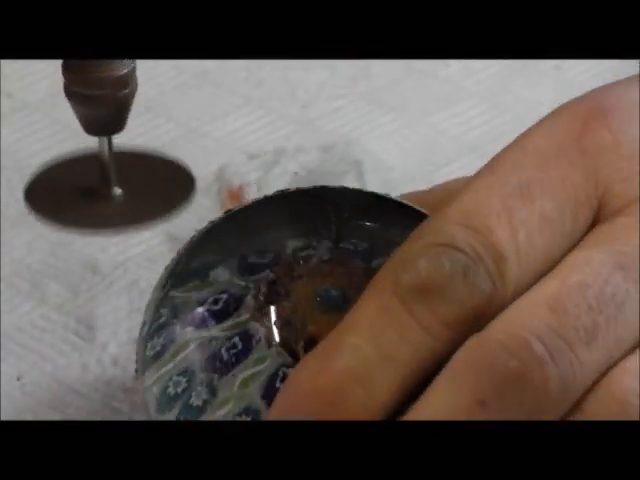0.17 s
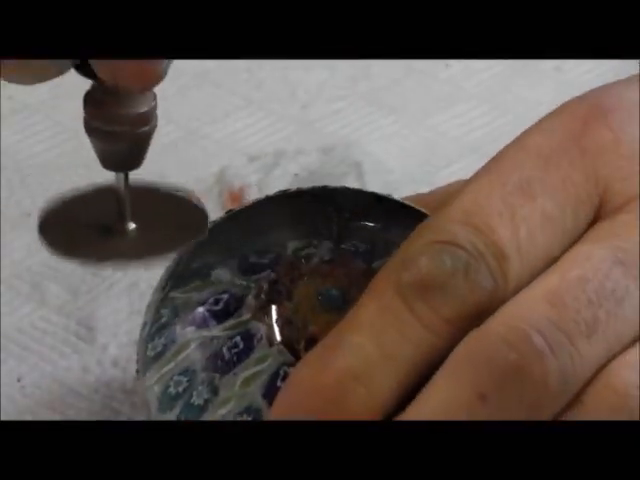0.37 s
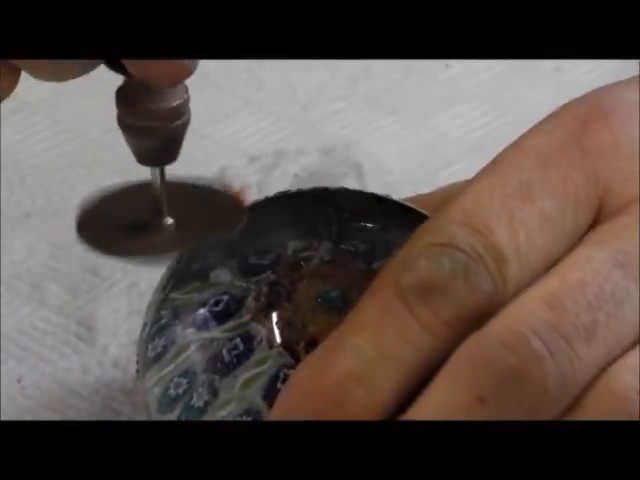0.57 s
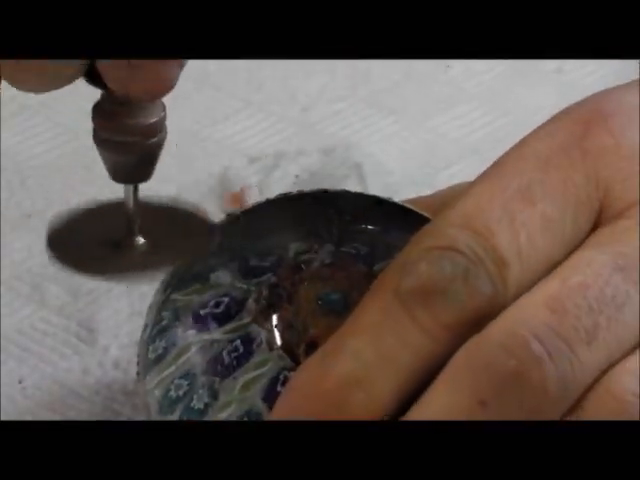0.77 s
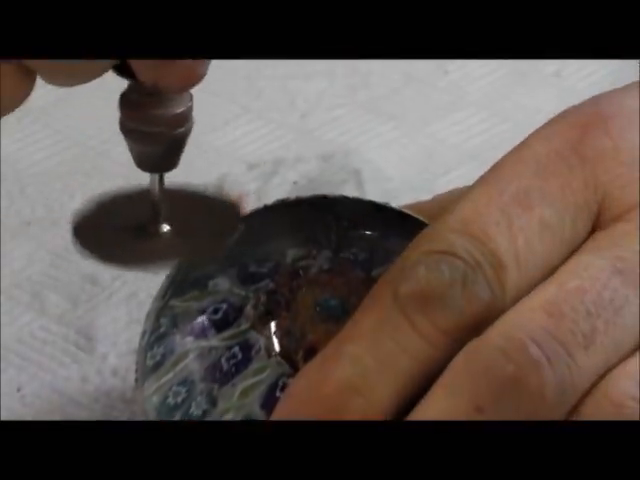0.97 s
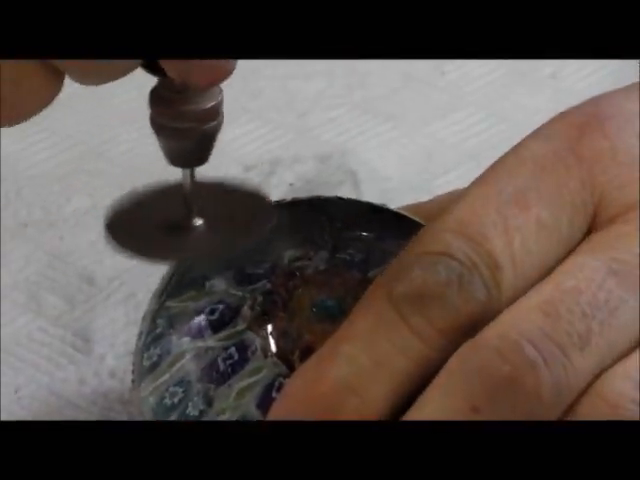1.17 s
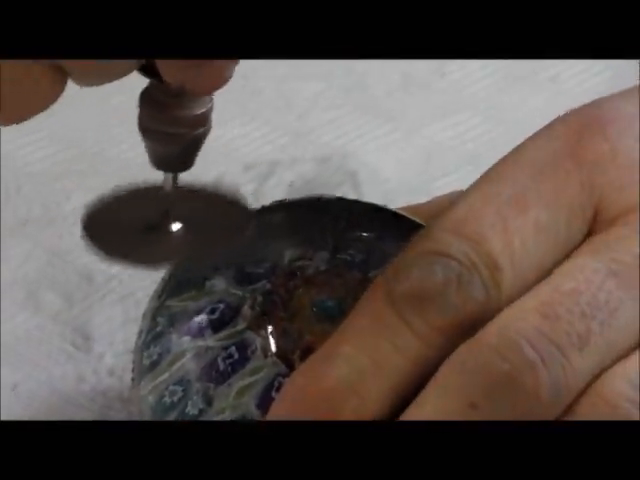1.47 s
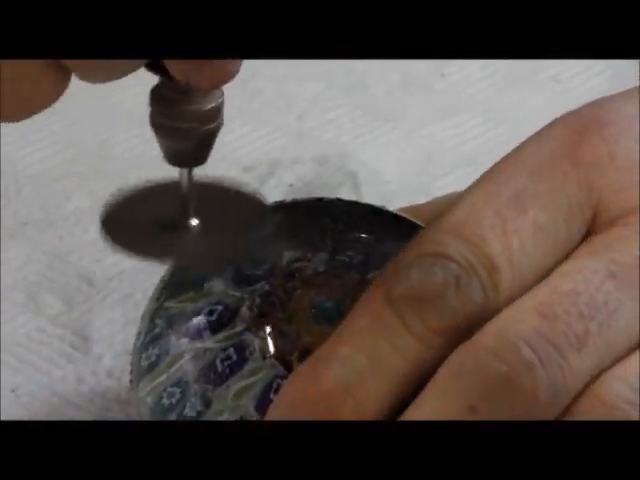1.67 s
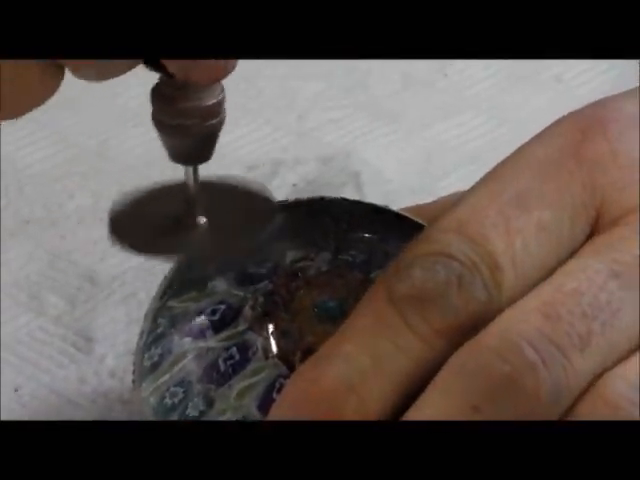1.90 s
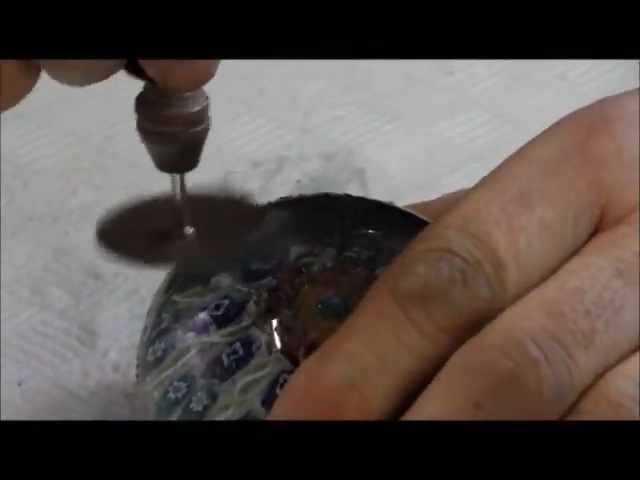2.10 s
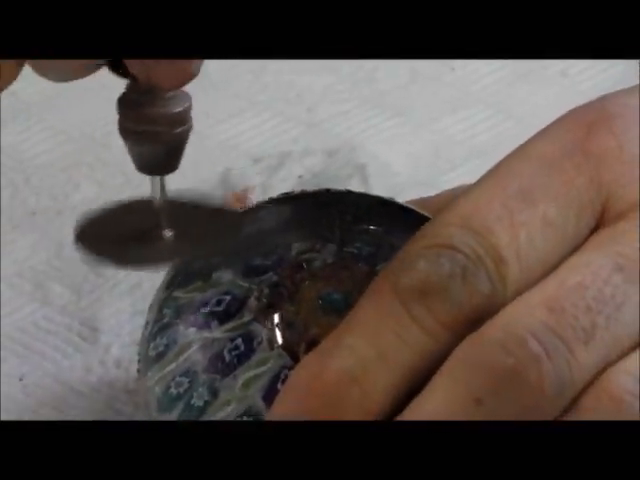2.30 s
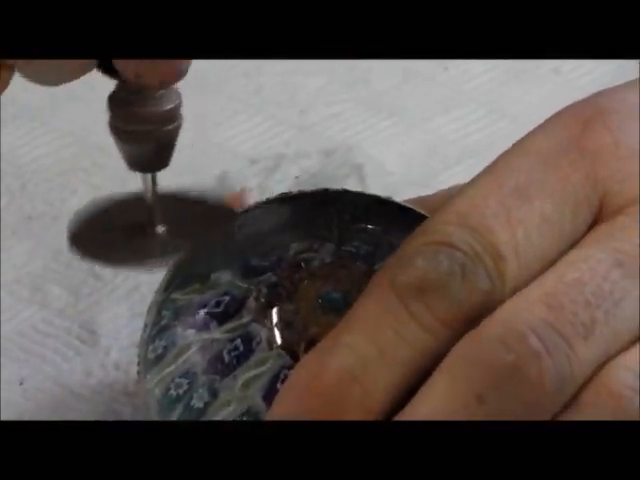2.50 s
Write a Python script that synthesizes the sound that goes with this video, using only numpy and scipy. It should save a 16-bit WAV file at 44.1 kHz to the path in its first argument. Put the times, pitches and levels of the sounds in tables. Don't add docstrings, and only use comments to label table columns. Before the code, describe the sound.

Gritty buzzing of a small spinning abrasive disc against glass, nine strokes, pitch sagging under load

```python
import sys
import numpy as np
from scipy import signal
from scipy.fft import rfft, irfft, next_fast_len
from scipy.io import wavfile
from scipy.ndimage import uniform_filter1d, map_coordinates

SR = 44100
rng = np.random.default_rng(int(sys.argv[2]) if len(sys.argv) > 2 else 0)


def gain_from_db(level_db):
    decades = np.asarray(level_db, float) / 20
    return 10 ** decades


def wav_record(signal):
    frames = np.transpose(np.atleast_2d(signal))
    bounded = np.clip(frames, -1, 1)
    quanta = np.round(bounded * 32767).astype(np.int16)
    wavfile.write(sys.argv[1], SR, quanta)


N = 116865
TIME_S = np.arange(N) / SR
FIRST_TOUCH_S = 0.432


def rms_one(x):
    return x / np.sqrt(np.mean(x ** 2) + 1e-20)


def in_time(rows):
    return np.interp(TIME_S, *np.transpose(rows))


def at_hz(points, hz):
    f, v = np.transpose(points)
    return np.interp(np.log(hz + 1), np.log(f + 1), v)


def drift(rate_hz):
    pole = np.exp(-80 * np.pi * rate_hz / SR)
    slow = rng.standard_normal(N // 40 + 2002)
    slow = signal.lfilter([1], [1, -2 * pole, pole * pole], slow)[2000:]
    return np.interp(np.arange(N) / 40, np.arange(len(slow)), rms_one(slow - slow.mean()))


def colour(x, spectrum, peaks=()):
    size = next_fast_len(N + 4096)
    hz = np.fft.rfftfreq(size, 1 / SR)
    power = gain_from_db(at_hz(spectrum, hz)) ** 2
    for centre_hz, width_hz, db in peaks:
        detuning = 2 * (hz - centre_hz) / (width_hz * 1.3)
        power += gain_from_db(db + 4) ** 2 / (1 + detuning ** 2) ** 2
    cepstrum = irfft(0.5 * np.log(power / power.mean()), size)
    cepstrum[1:size // 2] *= 2
    cepstrum[size // 2 + 1:] = 0
    return irfft(rfft(x, size) * np.exp(rfft(cepstrum)), size)[..., :N]


def above_8khz(x):
    return signal.sosfilt(signal.butter(8, 8000, "high", fs=SR, output="sos"), x)


# time_s, shaft_hz [turns per s]
SHAFT_SPEED = [(0, 125.6), (.44, 125.6), (.53, 120), (.63, 116.5), (.8, 115), (1.0, 114.5), (1.1, 112),
               (1.5, 112), (1.9, 112.5), (2.3, 108.8), (2.45, 112), (2.65, 110)]


def shaft_hz():
    return in_time(SHAFT_SPEED)


# order [multiple of shaft speed], level_db [dB rms]
WHINE_ORDERS = [(18, -36.5), (17.6, -52), (18.38, -50), (72.1, -46), (22.3, -53), (33, -55), (30.4, -55),
                (8.0, -53), (24.0, -55), (32.0, -55), (40.0, -50), (48.0, -58), (56.0, -62)]


def whine(turns):
    loaded = np.clip((TIME_S - FIRST_TOUCH_S) / 0.12, 0, 1)
    wander = np.cumsum(0.0006 * drift(30) * shaft_hz()) / SR
    tones = np.zeros(N)
    for order, level_db in WHINE_ORDERS:
        level = np.sqrt(2) * gain_from_db(level_db + 0.8 * drift(4))
        tones += level * np.sin(2 * np.pi * (order * (turns + wander) + rng.random()))
    return gain_from_db(-24 * loaded) * tones


# pitch_hz [Hz], level_db [dB rms]
FAN_TONES = [(100, -68.5), (200, -61), (300, -64), (400, -53), (500.3, -50)]


def hum():
    tones = np.zeros(N)
    for pitch_hz, level_db in FAN_TONES:
        level = np.sqrt(2) * gain_from_db(level_db + 1.5 * drift(5))
        tones += level * np.sin(2 * np.pi * pitch_hz * TIME_S + 0.4 * drift(6))
    return tones


# frequency_hz [Hz], level_db [dB]
AIR_SPECTRUM = [(25, -3.5), (330, -3.5), (480, 1), (1200, -0.5), (1500, 4.5), (2400, 7), (4200, 5.7),
                (7600, 2), (9000, -79)]
# frequency_hz [Hz], level_db [dB]
AIR_TOP_SPECTRUM = [(8050, -18.5), (9000, -16.5), (13000, -25.5), (15100, -23), (15900, -30.5)]


def air():
    low = gain_from_db(-30 + 0.32 * drift(6.7)) * colour(rng.standard_normal((2, N)), AIR_SPECTRUM)
    top = colour(above_8khz(rng.standard_normal((2, N))), AIR_TOP_SPECTRUM)
    return low + gain_from_db(-34) * rms_one(top)


# time_s [s], level_db [dB]
BACKGROUND_LEVEL = [(0, 0), (1.2, -2), (2.65, -4)]


def background_gain(push_db):
    excess_db = np.maximum(push_db + 26, 0)
    return gain_from_db(in_time(BACKGROUND_LEVEL) - 0.2 * uniform_filter1d(excess_db, 900))


# time_s [s], level_db [dB]
LIGHT_TOUCH = [(.45, -28), (1.2, -28.5), (2.6, -31.5)]
# start_s [s], length_s [s], first_push_db [dB], second_push_db [dB]
GLASS_STROKES = [
    (.432, 0.2, -21, -22),
    (0.694, 0.34, -22.5, -25),
    (1.054, 0.12, -16, -19.5),
    (1.285, .145, -17.5, -19),
    (1.526, 0.14, -18.5, -16.5),
    (1.81, 0.1, -19.5, -15.5),
    (2.059, 0.054, -21.5, -13),
    (2.238, 0.095, -24, -16),
    (2.482, 0.08, -22.5, -16),
]


def pressure_db():
    attack_s, bite_share, release_db_per_s = 0.025, 0.3, 203
    power = gain_from_db(in_time(LIGHT_TOUCH)) ** 2 * (TIME_S > FIRST_TOUCH_S + attack_s)
    for start_s, length_s, first_db, second_db in GLASS_STROKES:
        since_s = TIME_S - start_s
        progress = since_s / length_s
        db = first_db + (second_db - first_db) * np.clip(progress, 0, 1)
        db += 1.0 * np.exp(-((progress - 0.6) / 0.36) ** 2)
        db -= release_db_per_s * np.maximum(since_s - length_s, 0)
        swell = np.clip(since_s / attack_s + 0.5, 0, 1)
        onset = bite_share * (since_s > 0) + (1 - bite_share) * swell
        power = power + (gain_from_db(db) * onset) ** 2
    return 10 * np.log10(power + 1e-12) + 0.4 * drift(16.7)


# place [share of a turn, 0-1], level_db [dB]
RIM_HIGH_SPOTS = [
    (0.01, 0.1),
    (.1, -8),
    (.52, -7),
]


def knocks(turns, loose):
    scatter_db, swell_db, jitter_turns, wander_turns = 1.5, 3.5, 0.004, 0.03
    hits, turn = np.zeros(N), np.arange(int(turns[-1]) - 1)
    now = np.searchsorted(turns, turn)
    for place, spot_db in RIM_HIGH_SPOTS:
        luck = rng.standard_normal((len(turn), 2))
        shift = loose[now] * (jitter_turns * luck[:, 0] + wander_turns * drift(11)[now])
        at = np.interp(turn + place + shift, turns, np.arange(N)).astype(int)
        hits[at] += gain_from_db(spot_db + loose[now] * (scatter_db * luck[:, 1] + swell_db * drift(5.2)[now]))
    skid_s = 0.003
    age_s = np.arange(int(3 * skid_s * SR) + 2) / SR
    skid = np.convolve(hits, np.exp(-age_s / skid_s))[:N] * rng.standard_normal(N)
    return rms_one(hits + 0.4 * loose * skid)


def grit(throb):
    grains_per_s, spread_db = 4400, 1.24
    struck = rng.random(N) < grains_per_s / SR
    strength = gain_from_db(spread_db * np.minimum(rng.exponential(1, N), 5))
    return rms_one(struck * strength * rng.choice([-1, 1], N) * throb)


def rim_grain(turns):
    memory = 0.92
    rows = rng.standard_normal((int(turns[-1]) + 30, 130)) ** 3
    rows = signal.lfilter([1], [1, -memory], rows, axis=0)[28:]
    return rms_one(map_coordinates(rows, [np.floor(turns), turns % 1 * 129], order=0))


# frequency_hz [Hz], level_db [dB]
SCRAPE_SPECTRUM = [(300, -34), (700, -18.5), (1150, -16), (1400, -8.5), (2300, -2.5), (3500, -4.5),
                   (4400, 0.5), (5000, -5.5), (7600, -14), (9000, -23)]
# pitch_hz [Hz], width_hz [Hz], level_db [dB]
EARLY_MODES = [(915, 90, -17), (1630, 50, -9), (1930, 140, -1), (2280, 70, -4), (2510, 90, -3),
               (2780, 80, -2.5), (3110, 100, -7), (4170, 100, -5), (4390, 90, 1.5), (4630, 90, -6)]
# pitch_hz [Hz], width_hz [Hz], level_db [dB]
LATE_MODES = [(1370, 40, -4), (1560, 100, -2), (1920, 110, -3), (2200, 120, 1.5), (2480, 60, -3),
              (2750, 90, -6), (3320, 140, -6), (4060, 110, .1), (4260, 90, -3), (4380, 60, 1.5),
              (4565, 60, -5)]


def ringing(push, late):
    early_body = colour(np.sqrt(1 - late) * push, SCRAPE_SPECTRUM, EARLY_MODES)
    return early_body + colour(np.sqrt(late) * push, SCRAPE_SPECTRUM, LATE_MODES)


# order [multiple of shaft speed], level_db [dB]
LOAD_ORDERS = [(6.0, -42), (7.0, -53), (8.0, -45), (10.0, -51), (12.0, -50)]
# time_s [s], level_db [dB]
LOAD_ORDER_LEVEL = [(.45, -30), (.55, 0), (.9, -1), (1.2, -7), (2.65, -10)]


def loaded_orders(turns):
    tones = np.zeros(N)
    for order, level_db in LOAD_ORDERS:
        level = gain_from_db(level_db + 2 * drift(6))
        tones += level * np.sin(2 * np.pi * (order * turns + rng.random()))
    return tones * gain_from_db(in_time(LOAD_ORDER_LEVEL))


# frequency_hz [Hz], level_db [dB]
SPRAY_SPECTRUM = [(8050, -7), (10300, 3), (12200, 1.5), (14500, -4.5), (15900, -9.5)]


def spray(drive, throb, late, push_db):
    hiss = above_8khz(1.9 * drive + throb * rng.standard_normal(N))
    wet_db, follow_db = 6 * (1.5 - late), 0.6 * (push_db + 14.5)
    return rms_one(colour(hiss, SPRAY_SPECTRUM)) * gain_from_db(-35.5 + wet_db + follow_db)


def grinding(turns, push_db):
    loose = np.clip((TIME_S - 0.64) / 0.08, 0.1, 1)
    late = np.clip((TIME_S - 0.86) / 0.24 + 0.5, 0, 1)
    throb = 1 + 0.42 * np.cos(2 * np.pi * (turns - 0.1))
    knock_db = -1.5 + 3 * (1 - loose) + 0.8 * (np.clip(push_db, -32, 0) + 23)
    drive = gain_from_db(knock_db) * knocks(turns, loose)
    drive += gain_from_db(-8.5) * grit(throb)
    drive += gain_from_db(0.5 - 6 * late) * rim_grain(turns) * throb
    even = int(0.02 * SR)
    drive = drive / np.sqrt(uniform_filter1d(uniform_filter1d(drive ** 2, even), even))
    body = ringing(gain_from_db(push_db) * drive, late)
    return body + loaded_orders(turns) + spray(drive, throb, late, push_db)


def reflections(x, t60_s):
    t = np.arange(int(t60_s * SR)) / SR
    tail = rng.standard_normal((2, len(t))) * gain_from_db(-60 * t / t60_s)
    tail = tail / np.sqrt(np.sum(tail ** 2, 1, keepdims=True))
    return signal.fftconvolve(x[None], tail)[:2, :N]


# frequency_hz [Hz], likeness [0-1]
PORT_LIKENESS = [(60, 0.036), (180, 0.082), (550, .85), (1650, 0.9), (4970, 0.67), (15000, 0.1)]
# frequency_hz [Hz], level_db [dB]
PORT_BALANCE = [(60, -1), (125, 1.5), (250, 4.5), (1000, 5), (4000, 3), (8000, .3), (13000, -2)]
# frequency_hz [Hz], lag_s [s]
PORT_LAG = [(1000, 2.0e-5), (4400, 2.0e-5), (7000, 4.0e-5), (16000, 5.2e-5)]


def ports(shared, opposed):
    hz = np.fft.rfftfreq(N, 1 / SR)
    alike = np.clip(at_hz(PORT_LIKENESS, hz), 0, 1)
    side = np.array([[0.5], [-0.5]])
    both = np.sqrt(0.5 + alike / 2) * rfft(shared)
    both = both + 2 * side * np.sqrt(0.5 - alike / 2) * rfft(opposed)
    balance = gain_from_db(side * at_hz(PORT_BALANCE, hz))
    lag = np.exp(-2j * np.pi * side * hz * at_hz(PORT_LAG, hz))
    return irfft(both * balance * lag, N)


def scene():
    turns, push_db = np.cumsum(shaft_hz()) / SR, pressure_db()
    duck = background_gain(push_db)
    tones = (whine(turns) + hum()) * duck
    rush = air() * duck
    tool = grinding(turns, push_db)
    room = gain_from_db(-13) * reflections(tool, 0.22)
    near = np.roll(reflections(tool, 0.06)[0], 150)
    return ports(tool + tones + room[0] + rush[0], near + 0.22 * tones + room[1] + rush[1])


def band_limit(x):
    return signal.sosfilt(signal.butter(12, 16330, fs=SR, output="sos"), x)


def record(dry):
    x = 0.8 * np.tanh(dry / 0.8)
    low_hz, high_hz, top_hz = 7740, 7960, 15720
    shoulders = signal.butter(1, [low_hz - 200, high_hz + 200], "stop", fs=SR, output="sos")
    gap = signal.cheby2(8, 55, [low_hz, high_hz], "stop", fs=SR, output="sos")
    top_cut = signal.ellip(12, 0.3, 75, top_hz, fs=SR, output="sos")
    for stage in (shoulders, gap, top_cut):
        x = signal.sosfilt(stage, x)
    return band_limit(x)


dry = scene()
out = record(dry)
wav_record(out)
```